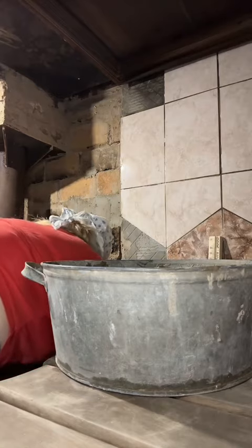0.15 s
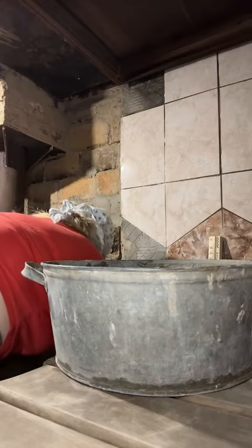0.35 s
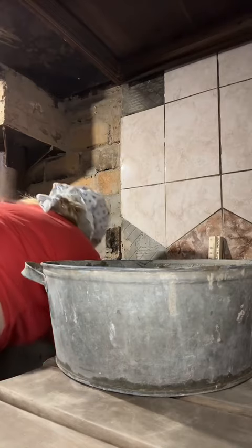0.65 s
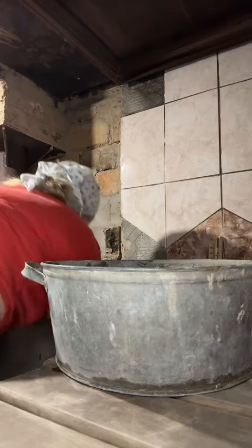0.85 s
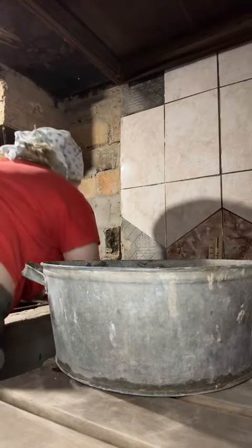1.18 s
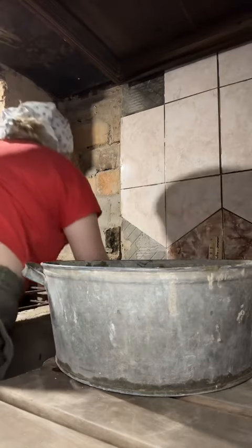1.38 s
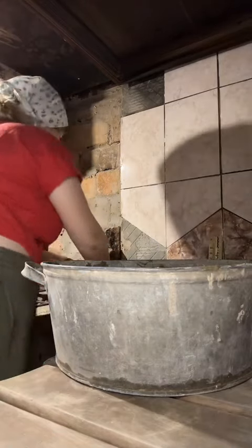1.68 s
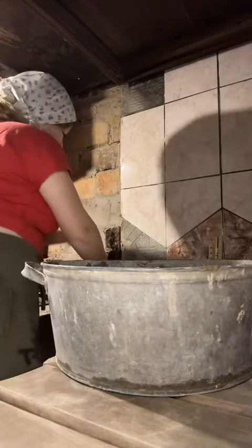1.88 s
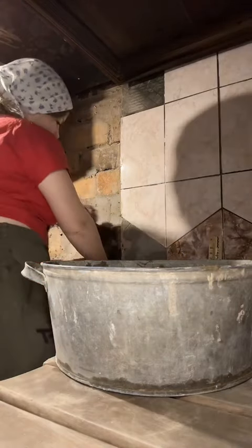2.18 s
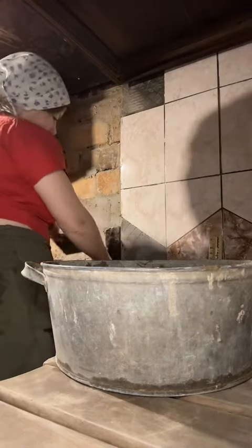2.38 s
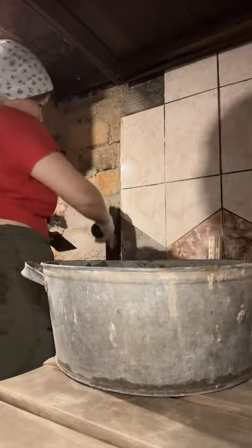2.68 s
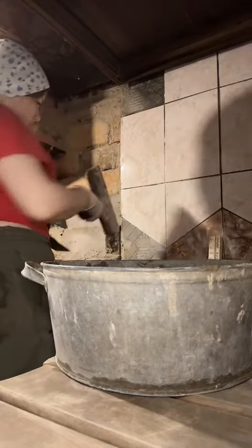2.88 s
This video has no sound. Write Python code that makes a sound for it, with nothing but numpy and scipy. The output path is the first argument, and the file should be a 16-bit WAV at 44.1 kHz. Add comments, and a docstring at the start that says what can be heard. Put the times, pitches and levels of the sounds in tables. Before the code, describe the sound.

Dry, bright scraping of a metal blade on brick in uneven strokes, long in the middle and choppier afterwards, with gritty cracks and soft knocks, fading at the end; close phone pickup, small room, faint background noise.

```python
"""Gritty scraping in strokes: a metal spatula is dragged over brick, close to a phone in a small room.
Dense random clicks become a bright hiss (edge), a middle rasp (blade) and a low rumble (wall).
Louder bursts are the edge catching on ridges; short bright cracks are loose grains.
Narrow bands of noise make wall and blade sing in spots, and fading sines make a few dull knocks.
A short room tail and a steady, quiet background noise lie underneath."""
import sys
import numpy as np
from scipy import signal
from scipy.fft import rfft, irfft
from scipy.io import wavfile
from scipy.ndimage import uniform_filter1d

SR = 44100
rng = np.random.default_rng(int(sys.argv[2]) if len(sys.argv) > 2 else 0)


def wav_record(signal):
    """Record a signal, one row per channel, as 16-bit PCM in the file named by sys.argv[1]."""
    frames = np.transpose(np.atleast_2d(signal))
    bounded = np.clip(frames, -1, 1)
    # unit amplitude maps onto the largest positive 16-bit level
    quanta = np.round(bounded * 32767).astype(np.int16)
    wavfile.write(sys.argv[1], SR, quanta)


N = 134505  # length of the sound in samples, about 3 s

WALL_LOW_HZ, WALL_TOP_HZ, EDGE_LOW_HZ = 129, 900, 3500  # borders of rumble, rasp and hiss


def undb(db):
    """Turn decibels into an amplitude gain."""
    return 10 ** (np.asarray(db) / 20)


def unit(x):
    """Scale to unit energy, so that a response keeps the rms level of white noise."""
    return x / np.sqrt(np.sum(x ** 2))


def convolve(x, response):
    """Pass a sound through an impulse response."""
    return signal.fftconvolve(x, response)[:N]


def walk(rate):
    """Random levels, rate new ones per second, joined by straight glides."""
    hold = int(SR / rate)
    steps = np.repeat(rng.standard_normal(N // hold + 1), hold)
    return uniform_filter1d(steps, hold)[:N]


def colour(points, size=4096):
    """Impulse response whose spectrum follows (f/Hz, level/dB) points, with its energy early."""
    hz, db = np.array(points, float).T
    grid = np.arange(size // 2 + 1) * SR / size
    level = np.interp(np.log(grid + 1), np.log(hz), db)
    # folding the cepstrum (the transform of the log spectrum) makes the response minimum phase
    cepstrum = irfft(np.log(undb(level)))
    cepstrum[1:size // 2] *= 2
    cepstrum[size // 2 + 1:] = 0
    return unit(irfft(np.exp(rfft(cepstrum))))


def ring(modes):
    """Sum of fading sines from (f/Hz, level/dB, t60/s); t60 is the time to fade by 60 dB."""
    t = np.arange(SR // 2) / SR
    return sum(undb(db - 60 * t / t60) * np.sin(2 * np.pi * hz * t) for hz, db, t60 in modes)


def spatula(t):
    """Grit clicks drive blade, edge and wall; each answers in its own slice of the spectrum."""
    # wall rumble: t/s, level re edge hiss of the plain slide/dB
    wall_levels = [(.2, -9.5), (.44, -17), (.6, -5.5), (.72, -14), (1.62, -12), (1.78, 7.5), (1.89, -25.5),
                   (2.06, -8), (2.14, -15.5), (2.28, -1.5), (2.63, -14.5), (2.7, -5), (2.77, -17.5),
                   (2.87, 10.5), (2.95, -17.5), (3.0, 0.5)]
    judder = walk(90)  # shared by all three parts
    blade, edge, slide = pressure(t)
    wall = slide * undb(np.interp(t, *np.array(wall_levels, float).T))
    rasp = convolve(blade * grit(judder), part([WALL_TOP_HZ, EDGE_LOW_HZ], "band"))
    hiss = convolve(edge * grit(judder), part(EDGE_LOW_HZ, "high"))
    rumble = convolve(wall * grit(judder), part([WALL_LOW_HZ, WALL_TOP_HZ], "band"))
    return rasp + hiss + rumble


def pressure(t):
    """Gains of blade and edge (strokes plus catches on ridges), and of the plain slide without catches."""
    # pressure of each stroke: t/s, hiss level/dB, blade rasp re hiss/dB
    strokes = [
        [(0, -65.5, 4), (.018, -43, -1.5), (.05, -54.5, -1), (.075, -68, 3), (.165, -92.5, 11)],
        [(.2, -50.5, 10.5), (.235, -42.5, 2.5), (.278, -44.5, 5.5), (.332, -45, 4), (.39, -35, -3.5),
         (.44, -30, 4), (.465, -37, 4.5), (.5, -42.5, -1.5), (.55, -68.5, 2)],
        [(.605, -64.5, 5.5), (.625, -56.5, -4), (.675, -59, -3.5)],
        [(.705, -39.5, -6.5), (.74, -39, -6.5), (.85, -36, -8.5), (.98, -38.5, -8), (1.21, -43, -11),
         (1.27, -40, -3), (1.35, -35.5, -11.5), (1.53, -37.5, -5.5), (1.63, -36, -9.5), (1.72, -57, -5),
         (1.76, -61, 2.5), (1.815, -73, 1)],
        [(1.838, -52, 4), (1.89, -39.5, -2.5), (1.95, -41.5, -6), (1.985, -35, -5), (2.0, -48.5, 4),
         (2.055, -52.5, -1)],
        [(2.09, -48, -5), (2.125, -42, -2), (2.15, -34.5, 0.5), (2.2, -39.5, 2), (2.25, -43, -2),
         (2.365, -48, -3)],
        [(2.39, -42.5, -1.5), (2.5, -38, -3.5), (2.62, -31, -6), (2.705, -37.5, -4), (2.77, -32.5, -8),
         (2.79, -38.5, -5.5), (2.845, -77, 1.5)],
        [(2.91, -70.5, 0), (2.955, -54.5, -13), (3.0, -68, 2)],
    ]
    # the edge catches on a ridge: t/s, hiss level before the burst shape/dB, blade rasp re hiss/dB, decay/s
    catches = [(0.201, -39, 7, 0.0043), (0.283, -30, 1.5, 0.021), (0.338, -28, 1, 0.011),
               (1.228, -31.5, -8, 0.0092), (1.731, -36, -1, 0.0063), (1.833, -37, 3, 0.0048),
               (1.923, -22.5, 0, 0.0072), (1.965, -25.5, 2, 0.011), (2.069, -33.5, -1.5, 0.0065),
               (2.133, -19.5, -3, 0.0042), (2.175, -24.5, -1, 0.012), (2.224, -29, -5, 0.007),
               (2.463, -28.5, -6, 0.013), (2.673, -21, -6, 0.0062), (2.861, -51, -5, .008),
               (2.992, -60, 11.5, 0.015)]
    attack_share = 0.3  # rise time as a share of the decay time
    rows = np.array([row for stroke in strokes for row in stroke], float)
    edge = np.interp(t, rows[:, 0], rows[:, 1])
    blade_re_edge = np.interp(t, rows[:, 0], rows[:, 2])
    power = undb([edge + blade_re_edge, edge]) ** 2
    for at, db, blade_db, decay in catches:
        age = np.maximum(t - at, 0)
        burst = (1 - np.exp(-age / (attack_share * decay))) * np.exp(-age / decay)
        power += (undb([[db + blade_db], [db]]) * burst) ** 2
    blade_gain, edge_gain = np.sqrt(power)
    return blade_gain, edge_gain, undb(edge)


def grit(judder):
    """Dense clicks of uneven size, bunched by the judder of the blade and a slower drift; rms 1."""
    clicks_per_s, judder_db = 14000, 1.21
    drift_db, drift_per_s = 0.7, 12
    hit = rng.random(N) < clicks_per_s / SR
    swing = undb(judder_db * judder + drift_db * walk(drift_per_s))
    clicks = hit * rng.standard_normal(N) * swing
    return clicks / np.std(clicks)


def part(hz, kind):
    """Response of one slice of the scraping spectrum, blade ring included."""
    # colour of the scraping: f/Hz, level per Hz/dB (relative)
    scrape_colour = [(130, -11.5), (243, -2.5), (593, -2.5), (797, -1.5), (1070, -7), (1710, -3.5),
                     (4070, -4), (6350, -4), (9710, -24.5), (15800, -19.5)]
    # blade resonances: f/Hz, level/dB (relative), t60/s
    blade_modes = [(660.6, 3, 0.15), (2170, 4, 0.013), (2880, 12.5, 0.0077), (5520, 33, 0.0021)]
    ring_db = -8.5  # energy of the blade ring re the scraping colour
    body = colour(scrape_colour)
    body = body + undb(ring_db) * unit(ring(blade_modes)[:len(body)])
    band = signal.butter(4, hz, kind, fs=SR, output="sos")
    return unit(signal.sosfilt(band, body))


def streaks(scrape):
    """Narrow resonances of the scrape that light up and die at random as the contact moves."""
    level_db, spread_db, changes_per_s, sharpness_q = -15.5, 7.5, 14, 22
    out = 0
    for hz in np.geomspace(450, 6500, 24):
        band = signal.lfilter(*signal.iirpeak(hz, sharpness_q, fs=SR), scrape)
        out = out + undb(spread_db * walk(changes_per_s)) * band
    return undb(level_db) * out


def ticks(t):
    """Loose grains crack under the edge: sudden, fading bursts of treble-heavy noise."""
    # cracks: t/s, level before the treble tilt/dB
    cracks = [(1.23, -38.5), (2.676, -38)]
    decay_s = 0.0031
    shape = 0
    for at, db in cracks:
        shape = shape + undb(db) * (t > at) * np.exp(-np.maximum(t - at, 0) / decay_s)
    return shape * np.diff(rng.standard_normal(N + 1))  # differences of noise favour the treble


def hums(t):
    """Wall or blade sings on one note: noise in a narrow resonance that swells and fades."""
    # singing spots: middle t/s, length/s, f/Hz, level/dB
    singing_spots = [(0.344, 0.2, 258, -55.5), (0.874, 0.11, 270.5, -47), (1.09, 0.25, 810, -51.5),
                     (1.306, 0.17, 724, -49), (1.57, .14, 803, -47), (1.643, 0.046, 447, -46),
                     (1.907, 0.074, 2500, -37), (1.89, 0.083, 1615, -41), (1.929, 0.0066, 1270, -28.5),
                     (1.971, 0.027, 2030, -28.5), (2.184, 0.043, 1187, -34.5), (2.292, 0.072, 433, -48),
                     (2.482, 0.055, 745, -38), (2.673, 0.076, 660, -39.5), (2.719, 0.037, 209, -42)]
    out, noise = 0, rng.standard_normal(N)
    for at, length, hz, db in singing_spots:
        note = signal.lfilter(*signal.iirpeak(hz, 11, fs=SR), noise)  # Q = 11
        swell = np.exp(-(2 * (t - at) / length) ** 2)
        out = out + undb(db) * swell * note / np.std(note)
    return out


def knocks():
    """Soft pushes ring low modes, which swell in over a few cycles, and give a short lump of bass."""
    # dull knocks: t/s, level/dB, thud f/Hz, thud re level/dB
    knock_list = [(0.198, -36, 110, -22.5), (1.737, -49.5, 109, -1.5), (1.928, -40, 121, -12),
                  (2.068, -28.5, 129, -8.5), (2.106, -47, 105, 7.5), (2.153, -52.5, 86, 13),
                  (2.208, -55, 65, 14), (2.667, -38, 150, -11.5)]
    # what every knock rings: f/Hz, level/dB, t60/s
    knock_modes = [(211.5, 4.5, 0.1), (309, -4.5, 0.12), (747, 9.5, 0.021)]
    push_s, swell_cycles, thud_s = 0.00097, 2.36, 0.042
    t = np.arange(SR // 2) / SR
    modes = sum((1 - np.exp(-t * mode[0] / swell_cycles)) * ring([mode]) for mode in knock_modes)
    lump = np.sin(np.pi * np.minimum(t / thud_s, 1))  # one smooth rise and fall
    out = np.zeros(N)
    for at, db, thud_hz, thud_db in knock_list:
        thud = undb(thud_db) * lump * np.sin(2 * np.pi * thud_hz * t)
        sound = modes + thud
        i = int(at * SR)
        out[i:i + len(sound)] += undb(db) * sound[:N - i]
    push = np.hanning(int(push_s * SR))
    return convolve(out, push / push.sum())  # a soft push rounds off the start


def room():
    """Echo tail of a small room: fading noise that starts after 3 ms."""
    t60_s = 0.055
    t = np.arange(SR // 2) / SR
    return unit(rng.standard_normal(len(t)) * undb(-60 * t / t60_s) * (t > .003))


def background():
    """Steady, quiet noise with a fixed colour."""
    # colour of the noise: f/Hz, level per Hz/dB (relative)
    floor_colour = [(25, -4), (59, 4.5), (269, -23), (654, -45), (5980, -7.5), (10500, -33), (15800, -27)]
    level_db = -66
    return undb(level_db) * convolve(rng.standard_normal(N), colour(floor_colour))


def scene():
    """Add all layers and the room tail; the same sound goes to both channels, so it sits in the middle."""
    room_db = -10
    t = np.arange(N) / SR
    scrape = spatula(t)
    direct = scrape + streaks(scrape) + ticks(t) + hums(t) + knocks()
    mid = direct + undb(room_db) * convolve(direct, room()) + background()
    return np.array([mid, mid])


def record(dry):
    """The phone cuts the top: a steep low-pass at 15850 Hz."""
    low_pass = signal.ellip(10, .2, 80, 15850, fs=SR, output="sos")
    return signal.sosfilt(low_pass, dry)


dry = scene()
out = record(dry)
wav_record(out)
```